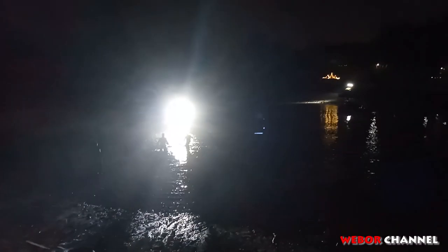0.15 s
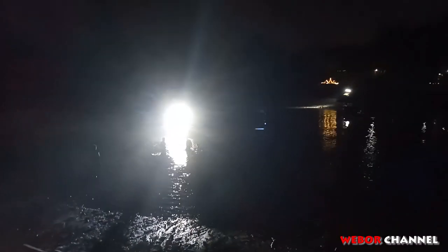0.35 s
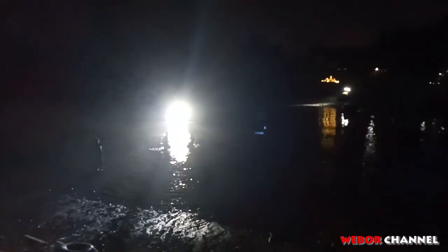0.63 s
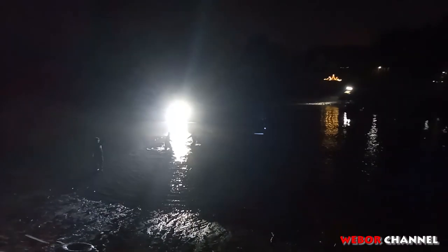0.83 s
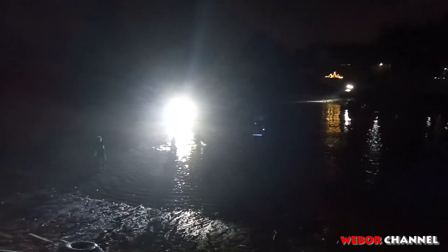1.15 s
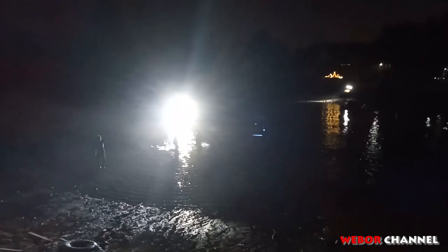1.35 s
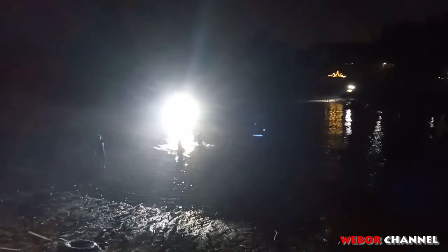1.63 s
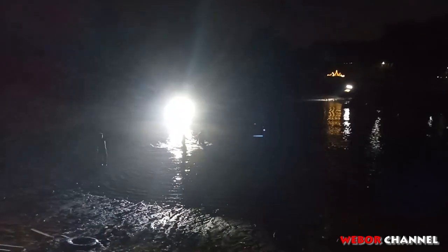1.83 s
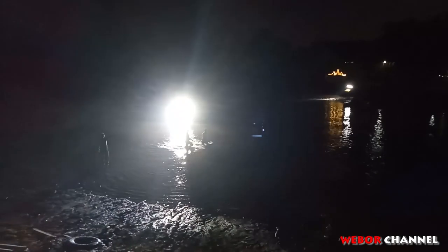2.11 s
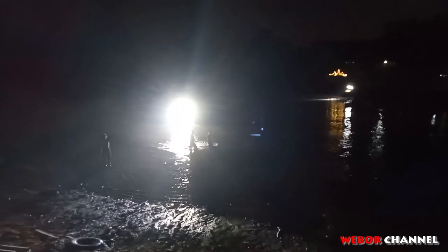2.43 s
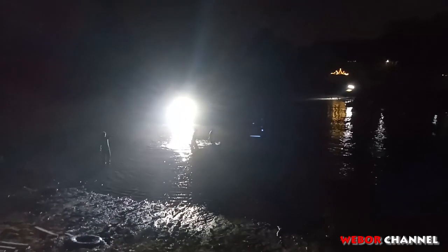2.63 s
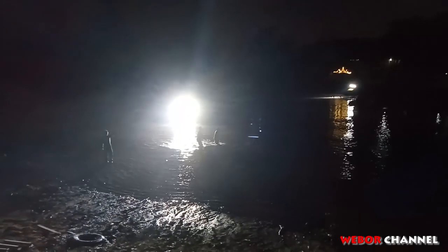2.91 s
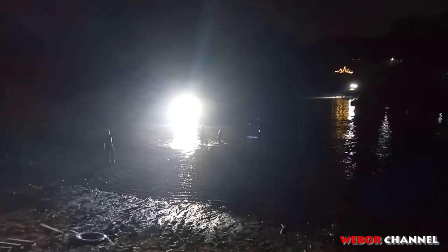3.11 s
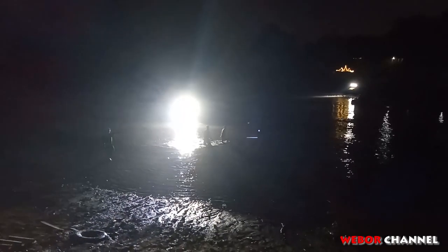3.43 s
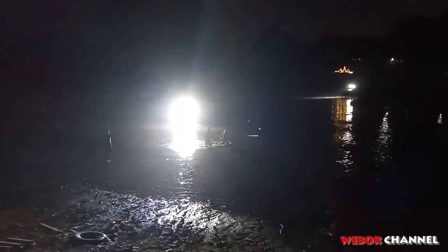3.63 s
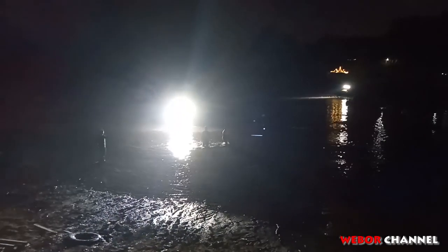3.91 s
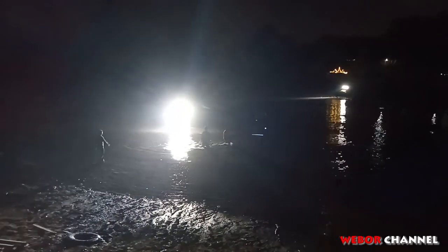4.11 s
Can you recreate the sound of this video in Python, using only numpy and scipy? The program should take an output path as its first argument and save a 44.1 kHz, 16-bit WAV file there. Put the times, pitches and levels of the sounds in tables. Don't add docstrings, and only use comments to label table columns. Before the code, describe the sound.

Low, muddy exhaust growl rises and falls in three throttle pushes across a shallow river, with churned water roaring and softly splashing.

```python
import sys
import numpy as np
from scipy import signal
from scipy.fft import rfft, irfft, next_fast_len
from scipy.io import wavfile
from scipy.ndimage import uniform_filter1d

SR = 44100
rng = np.random.default_rng(int(sys.argv[2]) if len(sys.argv) > 2 else 0)


def field_ratio(decibels):
    return 10 ** (np.asarray(decibels, dtype=float) / 20)


def put_to_file(sound):
    columns = np.atleast_2d(sound).T
    safe = np.clip(columns, -1, 1)
    whole_steps = np.round(safe * 32767)
    wavfile.write(sys.argv[1], SR, whole_steps.astype(np.int16))


N = 188199

# multiple of the firing rate, level relative to order 2 in dB.
WEAK_ORDERS = [(1.5, -20.5), (2.5, -27), (3.5, -24.5), (4.5, -17.5), (5, -23), (6, -21)]


def exhaust(phase, orders_db):
    orders = list(enumerate(orders_db, 1))
    orders += [(m, orders_db[1] + db) for m, db in WEAK_ORDERS]
    out = np.zeros(N)
    for m, db in orders:
        uneven = field_ratio((0.4 + 0.55 * m) * drift(11))
        spread = -m * m + 0.07 * m * drift(10)
        level = np.sqrt(2) * field_ratio(db + 0.35 - 0.57 * m)
        out += level * uneven * np.cos(m * phase + spread)
    return signal.sosfilt(signal.butter(4, 44, "high", fs=SR, output="sos"), out)


# time in seconds, firing rate in Hz.
SPEED = [(0, 80.9), (.12, 73), (.5, 66), (.84, 60.8), (1.1, 71.6), (1.48, 81), (1.82, 85), (1.91, 69.5),
         (2.06, 53), (2.3, 67.9), (2.56, 81), (2.76, 84.8), (3.0, 84), (3.17, 69.3), (3.4, 77.8),
         (3.62, 83.2), (3.86, 87), (4.27, 91)]


def engine_speed():
    return uniform_filter1d(in_time(SPEED)[0], size=SR // 25, mode="nearest")


def firing_phase(rate_hz):
    return 2 * np.pi * np.cumsum(rate_hz) / SR + 0.07 * drift(6)


# start in seconds, length in seconds, level in dB, third-order level in dB.
THROTTLE = [
    (0.919, 0.62, 0, 2),
    (2.094, 0.67, -1, 3),
    (3.31, 0.41, 0.5, -1.5),
]


def throttle():
    t = np.arange(N) / SR
    open_s, close_s = 0.05, 0.11
    opening, push_db, third_db = np.zeros((3, N))
    for s, length, db, extra_third_db in THROTTLE:
        rise = (t - s) / open_s + 0.5
        fall = (s + length - t) / close_s + 0.5
        push = np.clip(np.minimum(rise, fall), 0, 1)
        opening += push
        push_db += push * db
        third_db += push * extra_third_db
    return opening, push_db, third_db


# centre in seconds, length in seconds, lowest order in dB, higher orders in dB.
SURGES = [(0.422, 0.048, 0, -9), (1.08, .04, 0, -6), (1.21, 0.044, 2, -4.5), (1.44, 0.064, -5.5, -1),
          (1.7, 0.069, 1.5, -2.5), (1.776, 0.058, -2.5, 5.5), (1.898, 0.048, -19, -7), (1.97, .05, 3, 2.5),
          (2.036, 0.046, -6, -8), (2.13, 0.038, 3, 2.5), (2.33, 0.057, 0, -5), (2.526, 0.047, -3.5, -1.5),
          (2.63, 0.16, 5, 2.5), (2.84, 0.058, -1.5, -1), (2.936, 0.065, 3, 3.5), (3.105, 0.062, -9, 0),
          (3.223, .09, 1.5, 6), (3.36, 0.046, 3, 5.5), (3.507, 0.036, 0, -1.5), (3.567, 0.035, 2, 1.5),
          (3.766, 0.16, -3.5, -2), (3.872, .07, -5, 2), (4.0, .15, -4.5, -4.5)]


def surges():
    low_db, high_db = np.zeros((2, N))
    for s, length, low, high in SURGES:
        swell = bump(s, length)
        low_db += low * swell
        high_db += high * swell
    return low_db, high_db


# frequency in Hz, level in dB.
COASTING = [(54, -49), (62, -44.5), (69, -34.5), (82, -30), (130, -35), (172, -41), (210, -52), (340, -42)]
# frequency in Hz, level in dB.
PULLING = [(55, -42), (74, -30.5), (85, -28.5), (115, -26.5), (165, -29.5), (225, -52), (270, -38.5),
           (335, -45.5)]
# frequency in Hz, level in dB.
THIRD_PULLING = [(165, -41), (200, -46), (232, -43), (247, -33.5)]


def order_levels(rate_hz, opening, push_db, third_db):
    low_db, high_db = surges()
    orders_db = []
    for m, extra_db in enumerate([low_db, high_db, high_db + third_db, high_db], 1):
        coasting = at_hz(COASTING, m * rate_hz)
        pulling = at_hz(THIRD_PULLING if m == 3 else PULLING, m * rate_hz)
        orders_db.append((1 - opening) * coasting + opening * pulling + push_db + extra_db)
    return orders_db


# frequency in Hz, density in dB per Hz.
RUMBLE = [(20, -39.5), (45, -23.5), (56, -22), (70, -6.5), (92, 2.5), (135, 1.5), (170, -2), (200, -8.5),
          (250, -7), (330, -9.5), (430, -22), (620, -13.5), (900, -89.5)]


def rumble(faster_hz, opening):
    level_db = -35 + 0.1625 * faster_hz - opening
    return field_ratio(level_db) * coloured(RUMBLE, patchy_db=-1.5)


# frequency in Hz, density in dB per Hz.
ROAR = [(180, -29), (300, -9.5), (437, -12), (715, -12.5), (1040, -14.5), (1250, -16), (1430, -13.5),
        (1630, -18), (1800, -16.5), (2050, -20), (3190, -20), (3950, -24.5), (4600, -33.5), (5600, -52.5),
        (9000, -120)]


def roar(faster_hz, phase):
    nearer_db = 0.45 * np.arange(N) / SR
    level_db = -39.5 + 0.0677 * faster_hz + nearer_db
    puffs = 1 + 0.09 * np.cos(phase)
    return field_ratio(level_db) * water_echo(puffs * coloured(ROAR, patchy_db=0.85))


def water_echo(x):
    delay_s, echo_db, cutoff_hz = 0.002694, -12, 1230
    lag = round(delay_s * SR)
    dull = signal.lfilter(*signal.butter(1, cutoff_hz, fs=SR), x)
    late = np.concatenate([np.zeros(lag), dull[:-lag]])
    return rms_one(x + field_ratio(echo_db) * late)


# centre in seconds, length in seconds, level in dB.
BOOMS = [(.08, 0.074, -39), (.48, 0.16, -38), (1.05, 0.28, -38.5), (1.35, 0.37, -40.5), (1.76, .15, -34.5),
         (2.42, 0.12, -35.5), (2.7, .15, -33.5), (3.08, 0.19, -39.5), (3.55, .1, -38), (3.85, .08, -36),
         (4.0, 0.063, -32.5), (4.22, .25, -38.5)]


def silencer_boom():
    return field_ratio(-4) * swells(BOOMS, rest_db=-51.5) * band_noise(hz=296.7, width_hz=56)


# time in seconds, frequency in Hz, level in dB.
PIPE = [(3.75, 276, -46), (3.9, 286, -43), (4.05, 301, -47.5), (4.2, 317, -36), (4.27, 324, -41)]


def pipe_mode():
    return tone(PIPE, wobble_hz=3.25)


# time in seconds, frequency in Hz, level in dB.
WHINE = [(3.9, 1395, -58), (3.956, 1404, -47), (4.068, 1422, -44), (4.11, 1414, -47), (4.25, 1430, -44),
         (4.268, 1421, -49)]


def gear_whine():
    return tone(WHINE, wobble_hz=2.3)


# centre in
# seconds, length in seconds, frequency in Hz, bandwidth in Hz, level in dB.
SPLASH = [(0.022, 0.015, 910, 600, -38), (1.862, 0.016, 834, 700, -38.5), (2.55, 0.11, 514, 180, -40),
          (2.404, 0.19, 705, 300, -43.5), (2.9, 0.067, 1100, 130, -51), (3.1, 0.28, 1420, 180, -48.5),
          (3.628, 0.07, 1140, 250, -42.5), (3.53, 0.05, 1200, 1500, -43.5), (2.83, .12, 410, 70, -49.5),
          (3.97, 0.18, 760, 199, -46.5), (3.995, .4, 11300, 700, -95)]


def splashes():
    return sum(field_ratio(db) * bump(s, length) * band_noise(hz, width_hz) for s, length, hz, width_hz, db in SPLASH)


# frequency in Hz, density in dB per Hz.
HISS = [(3800, -37.5), (4600, 2), (5200, 2), (5650, -9), (5950, -2.5), (6300, -6), (7500, -2), (8100, -6.5),
        (8500, -15), (9800, -23.5), (11200, -20), (12300, -26), (13600, -19.5), (15400, -27)]


def hiss():
    return field_ratio(-67) * coloured(HISS, patchy_db=0.3)


# centre in seconds, length in seconds, level in dB.
GUSTS = [
    (0, .08, -52),
    (.35, 0.28, -61),
    (1.1, 0.5, -60),
    (2.26, .2, -54.5),
    (2.65, 0.18, -59),
    (3.25, .2, -57.5),
    (3.65, .2, -62),
    (4.27, .2, -58),
]


def breeze():
    return swells(GUSTS, rest_db=-69.5) * band_noise(hz=30, width_hz=43)


def tone(rows, wobble_hz):
    hz, db = in_time(rows)
    fade = np.clip((np.arange(N) / SR - rows[0][0]) / 0.079, 0, 1)
    turns = np.cumsum(hz + wobble_hz * drift(12)) / SR
    return np.sqrt(2) * fade * field_ratio(db + 0.6 * drift(45)) * np.sin(2 * np.pi * turns)


def coloured(spectrum, patchy_db):
    size = next_fast_len(N)
    hz = np.arange(1, size // 2 + 2) * SR / size
    shaped = rfft(rng.standard_normal(size)) * field_ratio(at_hz(spectrum, hz))
    place = 2 * np.log2(hz / 20)
    out = np.zeros(N)
    for k in range(21):
        slice_gain = np.clip(1 - np.abs(place - k), 0, 1)
        out += irfft(shaped * slice_gain, size)[:N] * field_ratio(patchy_db * drift(9))
    return rms_one(out)


def band_noise(hz, width_hz):
    edges_hz = [hz - width_hz / 2, hz + width_hz / 2]
    band = signal.butter(4, edges_hz, "band", fs=SR, output="sos")
    return rms_one(signal.sosfilt(band, rng.standard_normal(N)))


def drift(rate):
    r = np.exp(-80 * np.pi * rate / SR)
    noise = rng.standard_normal(N // 40 + 2002)
    slow = signal.lfilter([1], [1, -2 * r, r * r], noise)[2000:]
    return np.interp(np.arange(N) / 40, np.arange(len(slow)), rms_one(slow))


def swells(rows, rest_db):
    return field_ratio(rest_db) + sum(field_ratio(db) * bump(s, length) for s, length, db in rows)


def bump(s, length):
    return np.exp(-2 * ((np.arange(N) / SR - s) / length) ** 2)


def in_time(rows):
    s, *columns = np.transpose(rows)
    return [np.interp(np.arange(N) / SR, s, c) for c in columns]


def at_hz(points, hz):
    point_hz, db = np.transpose(points)
    return np.interp(np.log(hz), np.log(point_hz), db)


def rms_one(x):
    return x / np.sqrt(np.mean(x ** 2) + 1e-20)


def scene():
    rate_hz = engine_speed()
    phase = firing_phase(rate_hz)
    opening, push_db, third_db = throttle()
    orders_db = order_levels(rate_hz, opening, push_db, third_db)
    faster_hz = rate_hz - 75
    engine = exhaust(phase, orders_db) + rumble(faster_hz, opening) + roar(faster_hz, phase)
    engine += silencer_boom() + pipe_mode() + gear_whine()
    return (engine + splashes() + hiss() + breeze())[None]


def top_cut(x):
    return signal.sosfilt(signal.butter(12, 15500, fs=SR, output="sos"), x)


def record(dry):
    return top_cut(dry)


dry = scene()
out = record(dry)
put_to_file(out)
```